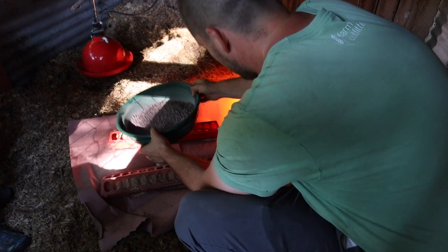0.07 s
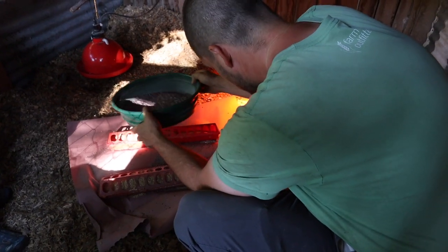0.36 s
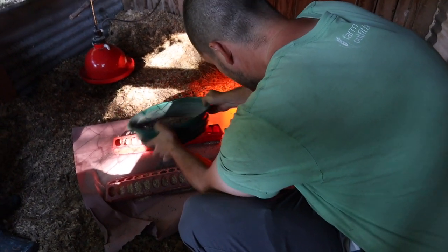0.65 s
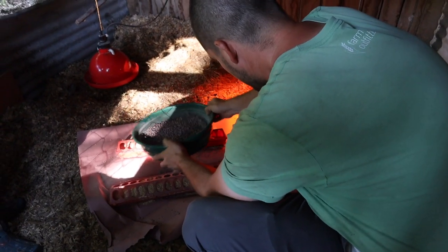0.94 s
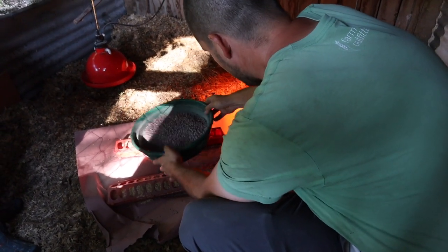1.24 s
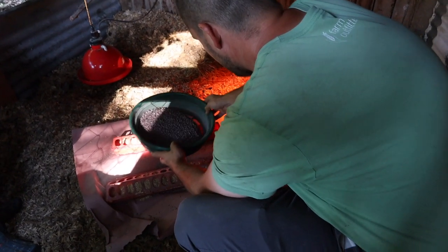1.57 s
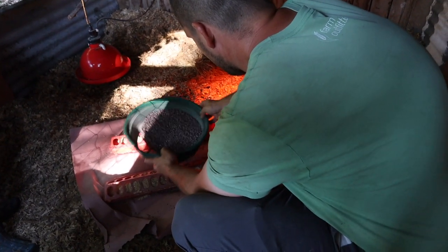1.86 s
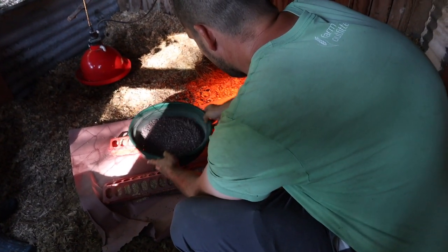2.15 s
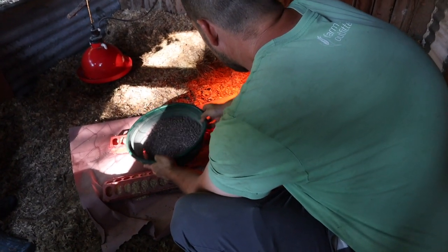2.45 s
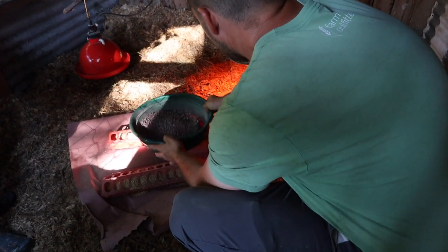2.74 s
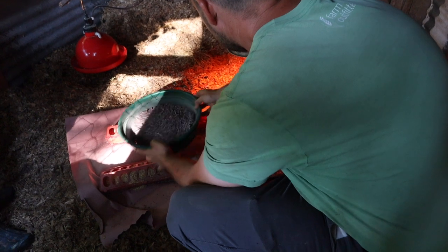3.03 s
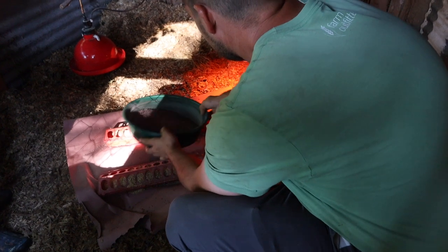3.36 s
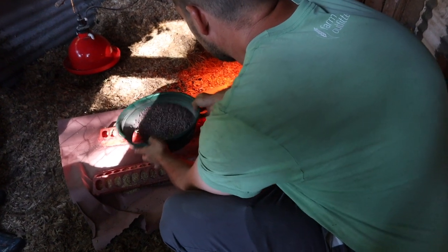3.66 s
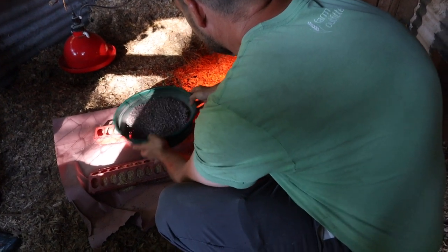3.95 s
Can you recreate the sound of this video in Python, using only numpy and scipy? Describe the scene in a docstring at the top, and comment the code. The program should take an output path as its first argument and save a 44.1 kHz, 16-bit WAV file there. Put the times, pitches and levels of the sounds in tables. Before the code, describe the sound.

Dry grains rattle in a pan close by. A single toss settles into a brief lull with faint chick peeps, then quick back-and-forth shaking brings rushing strokes, pattering and a few soft thumps in a small coop.

```python
"""Granules shaken in a pan

Dry granules are tossed, then shaken to and fro in a round pan inside a small chicken coop.
Each stroke sends a rush of colliding grains along the wall. Falling grains and clumps ring the
pan's floor, which flexes with a few soft thumps. Chicks peep faintly in the lull after the toss."""
import sys
import numpy as np
from scipy import signal
from scipy.fft import rfft, irfft
from scipy.io import wavfile

SR = 44100
rng = np.random.default_rng(int(sys.argv[2]) if len(sys.argv) > 2 else 0)


def generate_wav(signal):
    """Clip the signal to [-1, 1] and save it as 16-bit WAV at the path in sys.argv[1]."""
    frames = np.transpose(np.atleast_2d(signal))
    scaled = np.clip(frames, -1, 1) * 32767
    pcm = np.round(scaled).astype(np.int16)
    wavfile.write(sys.argv[1], SR, pcm)


N = 176400
T = np.arange(N) / SR
FULL_FLOW_DB = -28  # below this, collisions thin out


def amp(db):
    """Decibels to gain."""
    return 10 ** (np.asarray(db) / 20)


def unit(x):
    """Scale to rms 1."""
    return x / np.sqrt(np.mean(x ** 2) + 1e-20)


def level(points):
    """Gain over time from (t/s, level/dB) points."""
    return amp(np.interp(T, *np.transpose(points)))


def wander(top_hz):
    """Low-passed random movement, rms 1."""
    rolloff = 1 + (np.fft.rfftfreq(N, 1 / SR) / top_hz) ** 4
    return unit(irfft(rfft(rng.standard_normal(N)) / rolloff, N))


def convolve(x, taps):
    """Apply an impulse response scaled to unit energy."""
    return signal.oaconvolve(x, taps / np.linalg.norm(taps))[:N]


def colour(x, points, size=4096):
    """Minimum-phase filter of unit energy, shaped by (f/Hz, level/dB) points."""
    hz, db = np.transpose(points)
    bin_hz = abs(np.fft.fftfreq(size, 1 / SR))
    log_gain = np.log(amp(np.interp(np.log(bin_hz + 1), np.log(hz), db)))
    response = np.exp(np.conj(signal.hilbert(log_gain)))
    return convolve(x, np.fft.ifft(response).real)


def impacts(per_s, spread_db):
    """Random clicks, mostly small, a few large; even power at any rate."""
    sizes = amp(spread_db * np.minimum(rng.exponential(1, N), 4))
    signs = rng.choice([-1., 1.], N)
    struck = rng.random(N) < per_s / SR
    return unit(sizes * signs * struck / np.sqrt(per_s))


# Air spectrum: f/Hz, relative level/dB
AIR_SPECTRUM = [(30, 0), (400, -23.5), (4500, -21.5), (15000, -49)]


def air(level_db=-46.5):
    """Quiet, steady background air."""
    return amp(level_db) * colour(rng.standard_normal(N), AIR_SPECTRUM)


# Rumble envelope: t/s, level/dB
RUMBLE_ENVELOPE = [(0, -38.5), (.68, -44.5), (1.1, -47.5), (4, -55)]
# Rumble spectrum: f/Hz, relative level/dB
RUMBLE_SPECTRUM = [(15, -37), (39, -1), (56, -7.5), (84, 2), (125, -17.5), (185, -8), (450, -44.5)]


def handling():
    """Hands and arms rumble as they work the pan."""
    return level(RUMBLE_ENVELOPE) * colour(rng.standard_normal(N), RUMBLE_SPECTRUM)


def coop(x, t60_s=0.078, echoes_per_s=2000, gap_s=.004):
    """Short scattered reflections from close walls."""
    t = T[:SR // 3]
    signs = rng.choice([-1., 1.], len(t))
    arrivals = (rng.random(len(t)) < echoes_per_s / SR) * (t > gap_s)
    return convolve(x, signs * arrivals * amp(-60 * t / t60_s))


# Peeps: t/s, length/s, level/dB, start f/Hz, end f/Hz
CHICK_PEEPS = [(0.246, 0.062, -41, 3430, 3070), (0.28, 0.107, -50.5, 4130, 3900),
               (0.294, 0.032, -46, 3650, 3550), (0.385, 0.044, -42, 3730, 2740),
               (.446, .09, -49, 3810, 3580)]


def chicks(roughness=0.54, fuzz_hz=160, sag=1.28):
    """Thin, fuzzy whistles that fall in pitch, then level off."""
    out = np.zeros(N)
    for start_s, length_s, db, first_hz, last_hz in CHICK_PEEPS:
        progress = np.clip((T - start_s) / length_s, 0, 1)
        hz = last_hz + (first_hz - last_hz) * (1 - progress) ** sag
        whistle = np.exp(2j * np.pi * np.cumsum(hz) / SR)
        fuzz = 1 - roughness + roughness * (wander(fuzz_hz) + 1j * wander(fuzz_hz))
        envelope = np.sqrt(abs(np.sin(np.pi * progress)))
        out += amp(db) * envelope * (fuzz * whistle).real
    return out


# Pan flexes: t/s, level/dB, f/Hz
FLEX_THUMPS = [(.262, -29, 41.5), (0.376, -28.5, 67), (1.429, -20.5, 81), (2.85, -26, 87)]


def thumps(rise_s=0.012, overtone_ratio=2.14, overtone_db=-6.5):
    """The pan flexes in the hands: a low swell with one overtone."""
    out = np.zeros(N)
    for start_s, db, hz in FLEX_THUMPS:
        t = np.maximum(T - start_s, 0)
        swell = (t / rise_s * np.exp(1 - t / rise_s)) ** 2
        phase = 2 * np.pi * hz * t
        out += amp(db) * swell * (np.sin(phase) + amp(overtone_db) * np.sin(overtone_ratio * phase))
    return out


# Stray grain hits: t/s, relative level/dB
STRAY_HITS = [(0.091, -29), (.1201, -40), (0.16, -28), (.2308, -31)]


def strays(decay_s=.001, band_hz=(2500, 12000)):
    """Single late grains tick against the wall as the toss settles."""
    envelope = sum(amp(db) * (T >= s) * np.exp(-abs(T - s) / decay_s) for s, db in STRAY_HITS)
    bandpass = signal.butter(2, band_hz, "band", fs=SR, output="sos")
    return signal.sosfilt(bandpass, envelope * rng.standard_normal(N))


# Clump landings: t/s, relative level/dB
CLUMP_HITS = [(0.12, -30), (0.157, -26.5), (0.232, -33), (0.728, -23), (0.831, -26.5), (0.847, -20.5),
              (.915, -24), (1.068, -24), (1.149, -26.5), (1.317, -30), (1.496, -25.5), (1.735, -26.5),
              (1.811, -26.5), (1.854, -25.5), (1.937, -22), (2.078, -27), (2.123, -22.5), (2.291, -32),
              (2.352, -25), (2.609, -32), (2.637, -22), (2.825, -32), (3.012, -26), (3.091, -24.5),
              (3.195, -28.5), (3.468, -29), (3.517, -23.5), (3.551, -27), (3.66, -29), (3.984, -22)]
# Floor modes: f/Hz, relative level/dB, t60/s
FLOOR_MODES = [(173, -13, 0.12), (400.7, 4, 0.079), (525.4, -4.5, 0.087), (624, -3.5, 0.045),
               (752, -2.5, 0.073), (960, 8.5, 0.01)]


def blows(rise_s=0.0016, detune=0.0082, gain_db=-2):
    """Each clump's weight rings the floor; the shifting load retunes it from blow to blow."""
    out, t = np.zeros(N + SR), T[:SR // 5]
    attack = 1 - np.exp(-t / rise_s)
    for start_s, clump_db in CLUMP_HITS:
        tunings = 1 + detune * rng.standard_normal(len(FLOOR_MODES))
        ring = sum(amp(db - 60 * t / t60_s) * np.sin(2 * np.pi * hz * tuning * t)
                   for (hz, db, t60_s), tuning in zip(FLOOR_MODES, tunings))
        out[round(start_s * SR):][:len(t)] += amp(gain_db + clump_db) * attack * ring
    return out[:N]


# Patter envelope: t/s, relative level/dB
PATTER_ENVELOPE = [(0, -32), (.085, -31), (.15, -35.5), (.32, -45.5), (.43, -64), (.52, -53.5), (.72, -46),
                   (.745, -32.5), (1.95, -30.5), (2.95, -37), (3.38, -33.5), (3.455, -42), (3.505, -33),
                   (3.6, -38.5), (4, -33)]
# Floor knock spectrum: f/Hz, relative level/dB
KNOCK_SPECTRUM = [(60, -30.5), (225, -5.5), (300, -6), (420, 3.5), (670, -2), (800, 2), (2600, -5.5),
                  (5000, -13), (15000, -36)]


def patter(full_per_s=1300, bunch_db=3, bunch_hz=34.8, clump_decay_s=0.016, knock_db=1.5, ring_db=-8):
    """Grains drop in uneven bunches and clumps, knocking the floor and ringing its damped modes."""
    fall = level(PATTER_ENVELOPE)
    per_s = full_per_s * np.sqrt(np.minimum(fall / amp(FULL_FLOW_DB), 1))
    grains = unit(impacts(per_s, spread_db=1) * amp(bunch_db * wander(bunch_hz)))
    bursts = sum(amp(db) * (T >= s) * np.exp(-abs(T - s) / clump_decay_s) for s, db in CLUMP_HITS)
    hits = fall * grains + amp(-2.5) * bursts * impacts(per_s=2500, spread_db=1)
    t = T[:SR // 5]
    ring = sum(amp(db - 60 * t / t60_s) / np.sqrt(t60_s) * np.cos(2 * np.pi * hz * t)
               for hz, db, t60_s in FLOOR_MODES)
    return amp(knock_db) * colour(hits, KNOCK_SPECTRUM) + amp(ring_db) * convolve(hits, ring)


# Pan strokes: crest t/s, relative level/dB, half length/s
PAN_STROKES = [(.01, -25, 0.024), (0.563, -34.5, 0.026), (0.656, -21, 0.0039), (0.678, -19, 0.026),
               (0.772, -19, 0.037), (0.859, -20, 0.019), (0.923, -21.5, 0.05), (1.03, -19, 0.022),
               (1.114, -24, 0.03), (1.274, -22.5, 0.041), (1.4, -27.5, 0.025), (1.537, -21.5, 0.035),
               (1.662, -19.5, 0.034), (1.768, -20, 0.026), (1.867, -20.5, 0.028), (1.97, -17, 0.024),
               (2.063, -21, 0.029), (2.16, -18, 0.023), (2.251, -21, 0.025), (2.347, -17.5, 0.025),
               (2.438, -19, 0.026), (2.534, -19.5, 0.024), (2.635, -17.5, 0.033), (2.717, -18.5, 0.031),
               (2.823, -18, 0.035), (2.899, -18.5, 0.025), (2.992, -18, 0.032), (3.075, -17, 0.027),
               (3.168, -16, 0.031), (3.26, -19, 0.029), (3.361, -26, 0.037), (3.579, -15, 0.03),
               (3.682, -21.5, 0.04), (3.779, -17, 0.027), (3.875, -18.5, 0.033), (3.976, -16.5, 0.026)]


def surges(steepness=2.54, trail_db=-17, trail_s=0.055):
    """Flow envelope: each stroke throws a crest of grains with a short trail."""
    power = np.zeros(N)
    for crest_s, db, half_s in PAN_STROKES:
        t = T - crest_s
        crest = np.exp(-abs(t / half_s) ** steepness)
        trail = amp(trail_db) ** 2 * np.exp(-abs(t - half_s) / trail_s) * (t > 0)
        power += amp(db) ** 2 * (crest + trail)
    return np.sqrt(power)


# Slide between strokes: t/s, relative level/dB
SLIDE_ENVELOPE = [(0, -37), (.12, -40.5), (.3, -53), (.5, -76), (.525, -45), (.555, -29), (.7, -23.5),
                  (1.2, -27), (3.4, -27.5), (3.46, -39.5), (3.53, -28), (4, -34)]
# Rush spectrum: f/Hz, relative level/dB
RUSH_SPECTRUM = [(100, -23), (400, -20.5), (750, -12.5), (1150, -7), (1450, 1.5), (1820, 0.7), (2100, -1),
                 (2400, -4.5), (3100, -2.5), (5200, -3), (5900, -8), (6700, -9.5), (7800, -7.5),
                 (9600, -10.5), (12500, -18.5), (15800, -26)]


def rush(full_per_s=20000, thinning=1.3, treble_hz=6000, slide_treble_db=-3, surge_treble_db=2.5):
    """Grains collide along the wall; surges are denser and brighter than the slide."""
    slide, surge = level(SLIDE_ENVELOPE), surges()
    flow = np.hypot(slide, surge)
    treble_flow = np.hypot(slide * amp(slide_treble_db), surge * amp(surge_treble_db))
    density = np.clip(flow / amp(FULL_FLOW_DB), .02, 1) ** thinning
    grains = impacts(full_per_s * density, spread_db=3.5)
    treble = signal.sosfiltfilt(signal.butter(2, treble_hz, "high", fs=SR, output="sos"), grains)
    return amp(1) * colour((grains - treble) * flow + treble * treble_flow, RUSH_SPECTRUM)


def scene(pan_send_db=-14.5, peep_send_db=-0.5):
    """Pan close by, chicks further off, over rumble and air; mono."""
    pan = rush() + patter() + blows()
    peeps = chicks()
    direct = air() + handling() + peeps + thumps() + strays() + pan
    reflections = coop(amp(pan_send_db) * pan + amp(peep_send_db) * peeps)
    return (direct + reflections)[None]


def record(dry):
    """Steep low-pass at the top of the treble."""
    edge_hz = 15800
    lowpass = signal.firwin(511, edge_hz, window=("kaiser", 9), fs=SR)
    return signal.oaconvolve(dry, lowpass[None], "same")


dry = scene()
out = record(dry)
generate_wav(out)
```